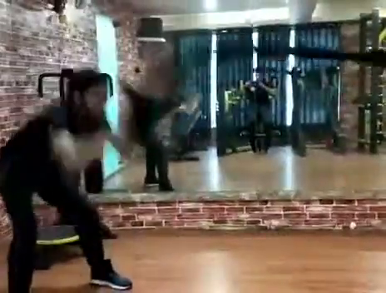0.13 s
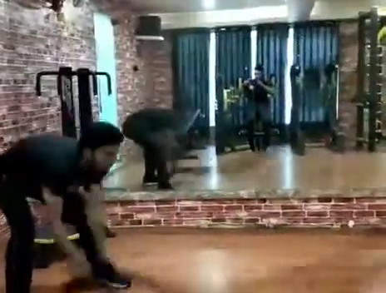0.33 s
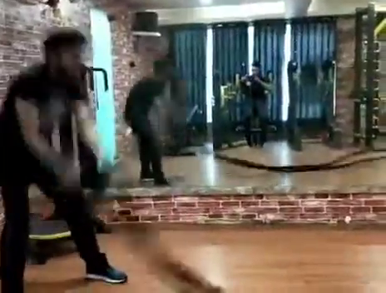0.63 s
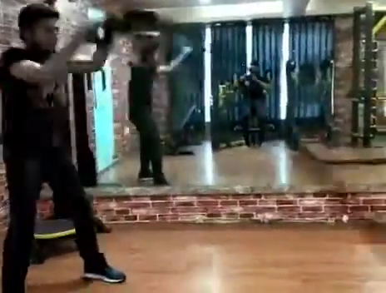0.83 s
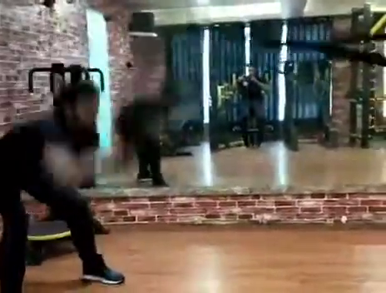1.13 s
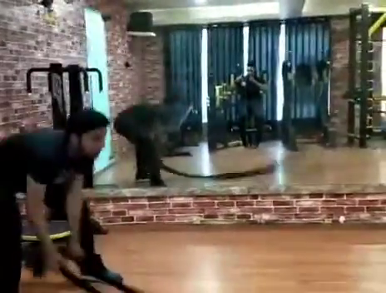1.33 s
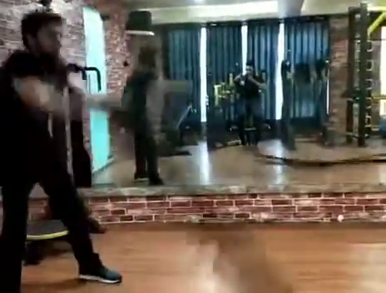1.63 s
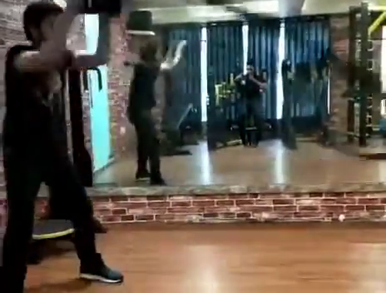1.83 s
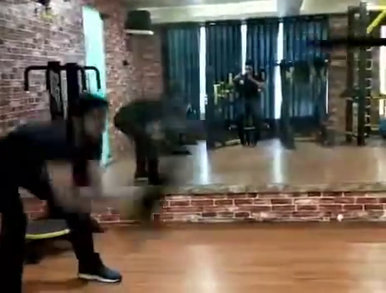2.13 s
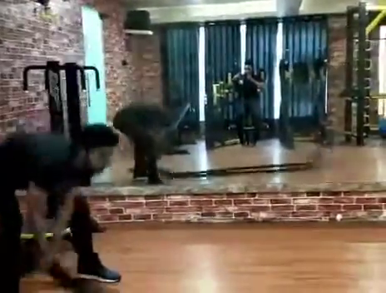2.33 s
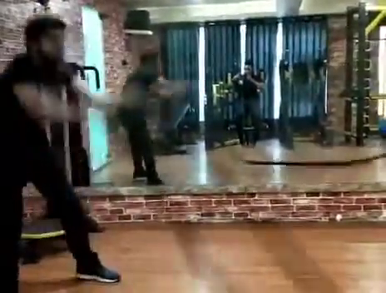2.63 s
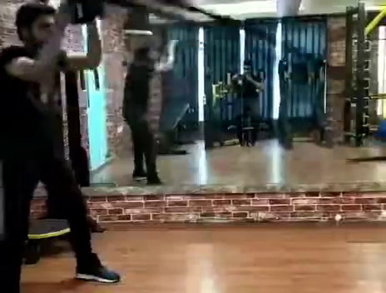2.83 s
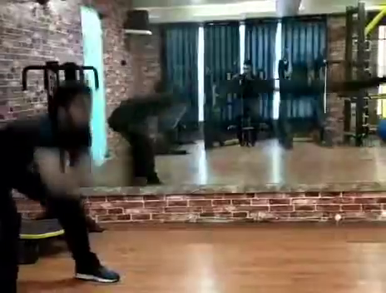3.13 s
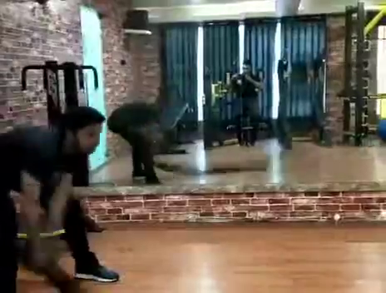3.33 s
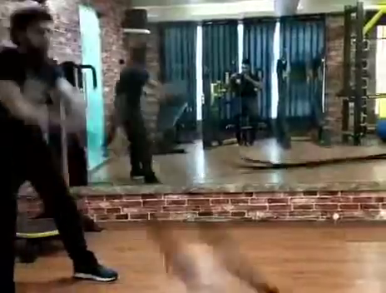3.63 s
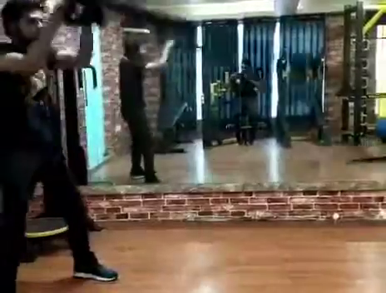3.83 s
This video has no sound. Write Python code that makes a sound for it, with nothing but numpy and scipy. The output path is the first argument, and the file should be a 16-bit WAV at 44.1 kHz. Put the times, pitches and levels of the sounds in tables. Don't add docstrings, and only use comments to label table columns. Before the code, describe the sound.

In an echoing brick gym, loud rope slams crack and boom on boards, slack ends flicking afterwards. Soft distant footfalls thump beneath steady air rush and low hum; stereo phone microphone, dull on top.

```python
import sys
import numpy as np
from scipy import signal
from scipy.fft import rfft, irfft, next_fast_len
from scipy.io import wavfile
from scipy.ndimage import uniform_filter1d

SR = 44100
rng = np.random.default_rng(int(sys.argv[2]) if len(sys.argv) > 2 else 0)


def transcribe(signal):
    frames = np.atleast_2d(signal).T
    limited = np.clip(frames, -1, 1)
    pcm = np.round(limited * 32767).astype(np.int16)
    wavfile.write(sys.argv[1], SR, pcm)


def ratio_of_db(decibels):
    return 10 ** (np.asarray(decibels, float) / 20)


N = 176400
LEAD_S = 0.5
TOTAL = N + round(LEAD_S * SR)

# frequency in Hz, level in dB per Hz.
AIR_COLOUR = [(25, -24), (50, -23), (130, -3), (400, -10.5), (1100, -18.5), (2400, -24.5), (3800, -34.5),
              (6000, -39)]
# centre in Hz, width in Hz, level in dB.
HUM_BANDS = [(37.6, 16, -45.5), (68.84, 12, -36.5), (116.3, 33, -43)]
# pitch in Hz, start in seconds, end in seconds, fade in seconds.
WHINE_TONE = (3200, .3, .575, .04)
# time in seconds, peak level in dB, pitch in Hz.
TREAD_EVENTS = [(0.557, -45.5, 201), (1.049, -33, 181), (1.298, -37, 158), (1.827, -25.5, 148),
                (1.979, -32, 154), (2.152, -26.5, 164), (2.328, -30, 164), (3.12, -28, 164),
                (3.299, -37, 146), (3.375, -43, 155), (3.447, -27.5, 173.5)]
# start in seconds, level in dB, time to the peak of the roll in seconds,
# board pitch in Hz, brightness in dB per octave.
ROPE_SLAMS = [
    (-.33, -7, 0.076, 398, 3.87),
    (0.6, -7, 0.03, 304, 3.28),
    (1.5429, -8.5, 0.022, 450, 3.17),
    (2.4807, -7, 0.0087, 360, 3.6),
    (3.5275, -8, 0.015, 575, 2.57),
]
# start in seconds, level in dB, time to the peak of the roll in seconds,
# board pitch in Hz, brightness in dB per octave.
SLACK_FLICKS = [
    (0.043, -22.5, 0.014, 406, 6.5),
    (0.8985, -12, 0.01, 401, 8.5),
    (1.796, -19.5, 0.0084, 312, 4),
    (2.552, -41, 0.0099, 378, -3),
    (2.851, -35, .031, 401, 4.5),
    (3.155, -31.5, 0.014, 390, 3),
    (3.717, -13, 0.0088, 595, 5),
]
# frequency in Hz, level in dB per Hz.
ROPE_COLOUR = [(50, -19.5), (90, 0.5), (240, 3), (450, 2.5), (1000, -3.5), (2050, -12.5), (2900, -17.5),
               (4000, -25.5)]
# frequency in Hz, time to fall 60 dB in seconds.
ROOM_RING = [(120, 2.38), (350, 1.63), (1000, 0.9), (3000, 1.167), (6000, 1.145), (12000, 0.84)]
# frequency in Hz, side over mid in dB.
STEREO_WIDTH = [(60, -22), (180, -18), (550, -6), (1650, 1), (4970, -0.5), (15000, 1.5)]
# frequency in Hz, gain in dB.
PORT_COLOUR = [(3800, -11.78), (4600, -8.5), (5300, -6), (5900, -12.5), (7000, -26), (9000, -35),
               (15000, -39)]


def unit(x):
    return x / np.sqrt(np.mean(x ** 2) + 1e-20)


def along(points, hz):
    f, value = np.transpose(points)
    return np.interp(np.log(hz + 1), np.log(f + 1), value)


def filtered(x, response):
    n = x.shape[-1]
    size = next_fast_len(n + 8192)
    hz = np.fft.rfftfreq(size, 1 / SR)
    return irfft(rfft(x, size) * response(hz), size)[..., :n]


def causal(gain_db):
    cepstrum = irfft(gain_db(np.fft.rfftfreq(4096, 1 / SR)) * np.log(10) / 20)
    cepstrum[1:2048] *= 2
    cepstrum[2049:] = 0
    return irfft(np.exp(rfft(cepstrum)))[:2048]


def resonance(x, hz, q):
    return filtered(x, lambda f: 1j * f * hz / q / (hz * hz - f * f + 1j * f * hz / q))


def add(track, s, sound):
    part = track[:, round((s + LEAD_S) * SR):][:, :sound.shape[1]]
    part += sound[:, :part.shape[1]]


def room(x):
    hz, t, z = signal.stft(rng.standard_normal((2, SR + SR // 2)), SR, nperseg=256)
    t60 = np.clip(along(ROOM_RING, hz), 0.1, 3)
    tail = signal.istft(z * ratio_of_db(-60 * t / t60[:, None]), SR, nperseg=256)[1]
    return signal.fftconvolve(x[None], tail / np.linalg.norm(tail[0]), axes=1)


def diffuse(slaps, fade=1):
    hz, t, z = signal.stft(rng.standard_normal((2, SR + SR // 2)), SR, nperseg=128)
    energy = np.bincount(np.arange(len(slaps)) // 64 + 1, slaps ** 2)
    t60 = np.clip(fade * along(ROOM_RING, hz), 0.05, 3)
    decay = ratio_of_db(-120 * t / t60[:, None])
    gathered = signal.fftconvolve(decay, energy[None], axes=1)[:, :len(t)]
    level = np.sqrt(abs(gathered) * 10 / SR)
    return signal.istft(z * level * (t > 0), SR, nperseg=128)[1]


def ventilation():
    level_db, patch_db, top_hz = -30, 0.4 * 5.07, 6350
    z = signal.stft(rng.standard_normal((2, TOTAL)), nperseg=512)[2]
    field = uniform_filter1d(rng.standard_normal(z.shape[1:]), size=4, axis=0)
    field = uniform_filter1d(field, size=10, axis=1)
    pair = signal.istft(z * ratio_of_db(patch_db * unit(field)), nperseg=512)[1][:, :TOTAL]

    def colour(hz):
        return ratio_of_db(along(AIR_COLOUR, hz)) * (hz > 20) / (1 + (hz / top_hz) ** 20)
    return ratio_of_db(level_db) * unit(filtered(pair, colour))


def hum():
    out = np.zeros((2, TOTAL))
    for hz, width, db in HUM_BANDS:
        noise = rng.standard_normal((2, TOTAL))
        out += ratio_of_db(db) * unit(filtered(noise, lambda f: 1 / (1 + (2 * (f - hz) / width) ** 2)))
    return out


def whine():
    level_db = -45
    hz, start, end, fade = WHINE_TONE
    t = np.arange(TOTAL) / SR - LEAD_S
    sway = 1 + 0.2 * unit(uniform_filter1d(rng.standard_normal(TOTAL), size=1500))
    envelope = np.clip(np.minimum(t - start, end - t) / fade, 0, 1)
    return ratio_of_db(level_db) * sway * envelope * np.sin(2 * np.pi * hz * t) * [[1], [0.3]]


def treads():
    t60_s, rise_s, level_db, room_db = 0.087, 0.00718, 9.7, -35
    flutter_s, loss_db = 0.0371, 3
    out, t = np.zeros((2, TOTAL)), np.arange(SR // 8) / SR
    shape = ratio_of_db(-60 * t / t60_s) * (1 - np.exp(-t / rise_s)) ** 2
    shape = shape / shape.max()
    for s, db, hz in TREAD_EVENTS:
        shifts = rng.normal(0, 0.1, 4) * [0, 1, 1, 1]
        for k, shift in enumerate(shifts):
            tone = np.sin(2 * np.pi * hz * (1 + shift) * t)
            thump = ratio_of_db(db + level_db - loss_db * k) * shape * tone
            add(out, s - rise_s + k * flutter_s, thump * [[1], [0]])
        add(out, s, ratio_of_db(room_db + loss_db * k) * room(thump))
    return out


def slap_run(peak_s):
    count, roll_turns, scatter_db = 60, 2.3, 3.5
    first_db, first_per_s_db = -2.5, -120
    u, size = rng.random(count) * roll_turns, rng.standard_normal(count)
    swell = np.sqrt(u * np.exp(1 - u) / count)
    strength = np.sign(size) * ratio_of_db(scatter_db * abs(size)) * swell
    slaps = np.bincount(np.round(u * peak_s * SR).astype(int), strength)
    slaps[0] = -ratio_of_db(first_db + first_per_s_db * peak_s)
    return slaps


def ropes():
    board_db, board_q, board_fade = -1, 9.9, 0.88
    crack_hz, crack_db, crack_q, crack_fade = 2100, 6.5, 4.9, 0.13
    direct_db = -11.5
    out = np.zeros((2, TOTAL))
    for s, db, peak_s, board_hz, bright_db in ROPE_SLAMS + SLACK_FLICKS:
        slaps = slap_run(peak_s)
        heard = diffuse(slaps)
        heard += ratio_of_db(board_db) * 2 * resonance(diffuse(slaps, board_fade), board_hz, board_q)
        heard += ratio_of_db(crack_db) * resonance(diffuse(slaps, crack_fade), crack_hz, crack_q)
        soft_start = np.clip(np.arange(len(slaps)) / 90, 0.3, 1)
        heard[:, :len(slaps)] += ratio_of_db(direct_db) * slaps * soft_start * [[1], [0.3]]
        colour = causal(lambda hz: along(ROPE_COLOUR, hz) + bright_db * np.log2((hz + 50) / 500))
        heard = signal.fftconvolve(heard, colour[None] / np.linalg.norm(colour), axes=1)
        add(out, s, ratio_of_db(db) * np.sqrt(SR / 10) * heard)
    return out


def spread(pair):
    left_db = 0.33
    mid, side = pair[0], filtered(pair[1], lambda hz: ratio_of_db(along(STEREO_WIDTH, hz)))
    return np.array([(mid + side) * ratio_of_db(left_db), (mid - side) * ratio_of_db(-left_db)])


def scene():
    return spread(ventilation() + hum() + whine() + treads() + ropes())[:, -N:]


def thin_treble(x):
    from_hz, patchy_hz, top_hz = 6100, 7600, 15200
    floor_db, kept, onset_db = -91, 0.33, 4
    hz, _, z = signal.stft(x, SR, nperseg=1024)
    power = uniform_filter1d(np.mean(abs(z) ** 2, 0), size=8, axis=0)
    cell_db = 10 * np.log10(abs(power) + 1e-20)
    luck = rng.random((len(hz) // 6 + 1, z.shape[2] // 3 + 1)).repeat(6, 0).repeat(3, 1)
    luck = luck[:len(hz), :z.shape[2]]
    top_db = cell_db[hz > from_hz].mean(0)
    onset = np.diff(top_db, prepend=top_db[0]) > onset_db
    f = hz[:, None]
    lucky = (luck < kept + (f < patchy_hz)) & (f < top_hz)
    at_onset = onset & (f < top_hz + 550)
    keep = (lucky | at_onset) & (cell_db > floor_db) | (f < from_hz)
    makeup = np.where((f > patchy_hz) & ~onset, kept ** -0.5, 1)
    return signal.istft(z * keep * makeup, SR, nperseg=1024)[1][:, :N]


def low_pass(x):
    return signal.sosfilt(signal.butter(12, 15800, fs=SR, output="sos"), x)


def record(dry):
    ceiling, hardness = 0.65, 3
    port = causal(lambda hz: along(PORT_COLOUR, hz))
    heard = signal.fftconvolve(dry, port[None], axes=1)[:, :N]
    heard = heard / (1 + abs(heard / ceiling) ** hardness) ** (1 / hardness)
    return low_pass(thin_treble(heard))


dry = scene()
out = record(dry)
transcribe(out)
```